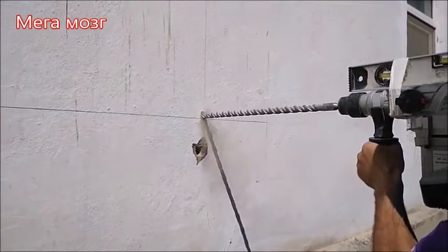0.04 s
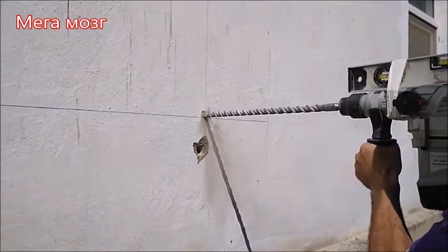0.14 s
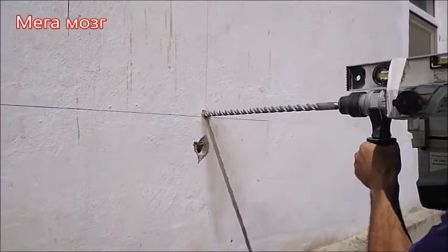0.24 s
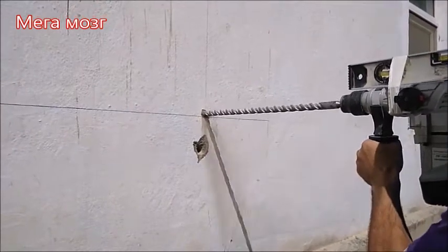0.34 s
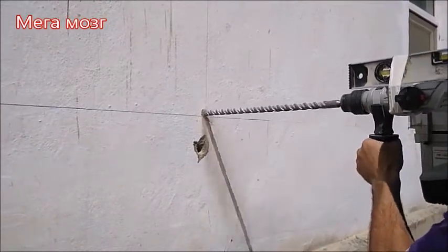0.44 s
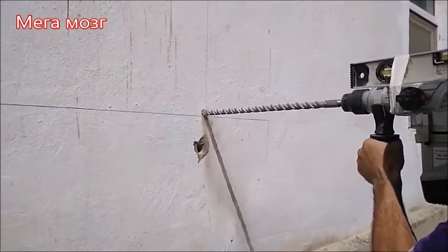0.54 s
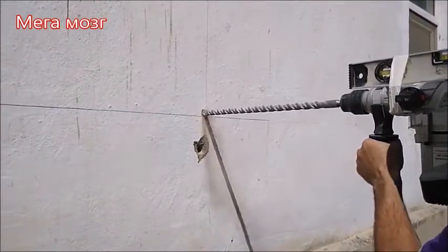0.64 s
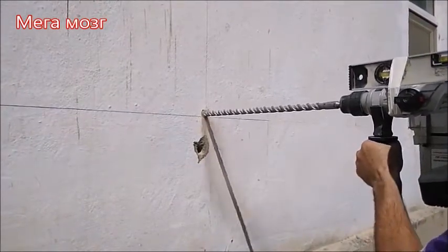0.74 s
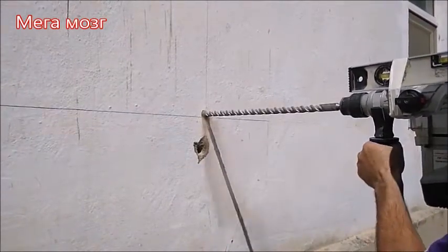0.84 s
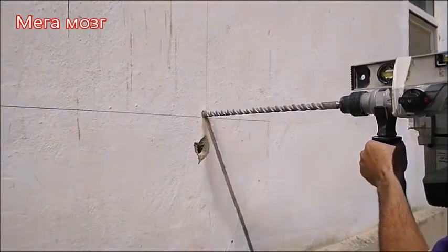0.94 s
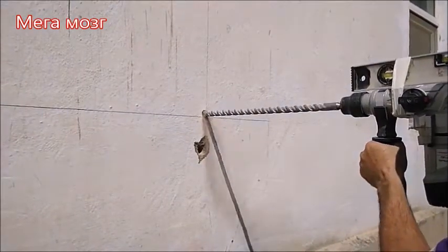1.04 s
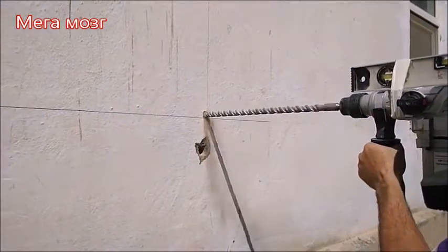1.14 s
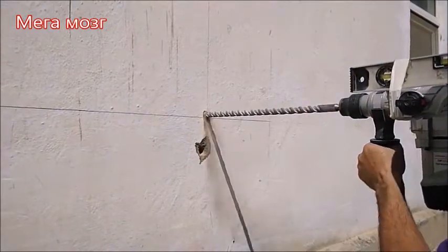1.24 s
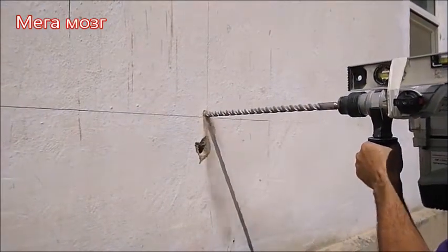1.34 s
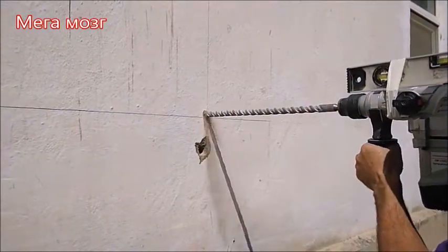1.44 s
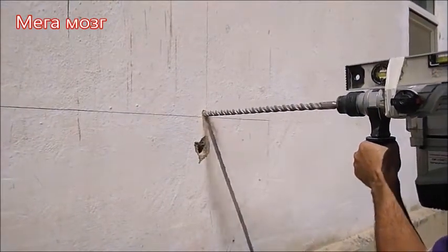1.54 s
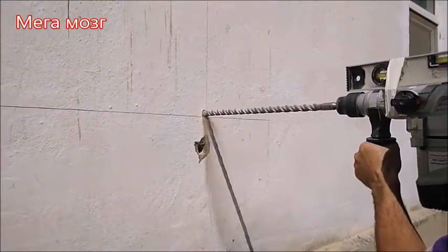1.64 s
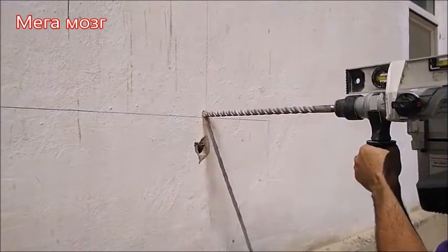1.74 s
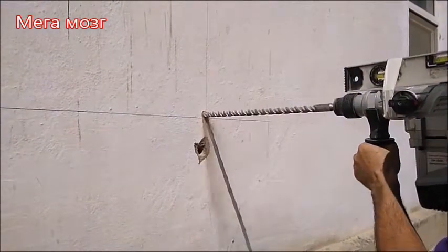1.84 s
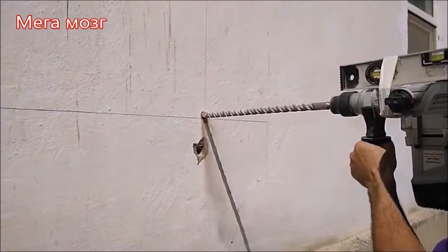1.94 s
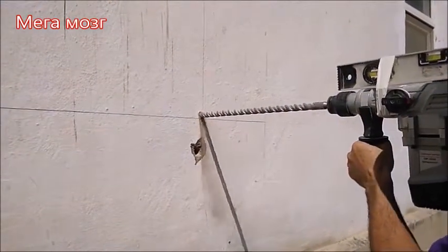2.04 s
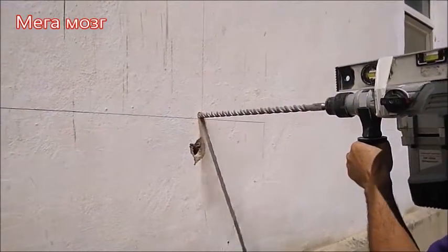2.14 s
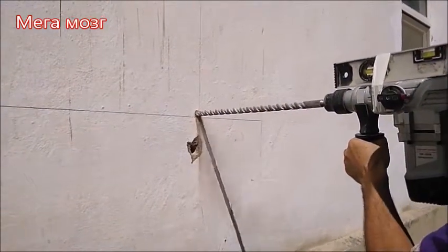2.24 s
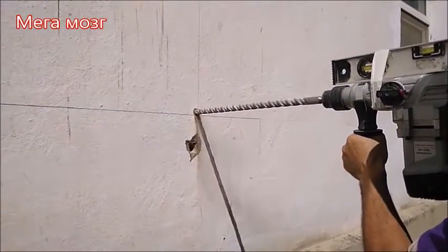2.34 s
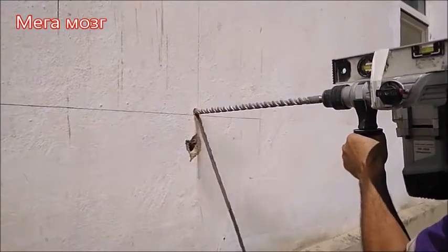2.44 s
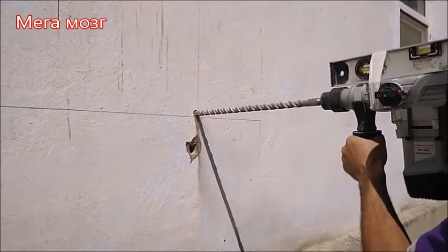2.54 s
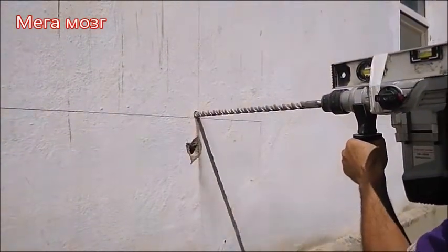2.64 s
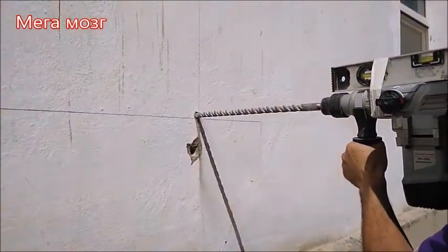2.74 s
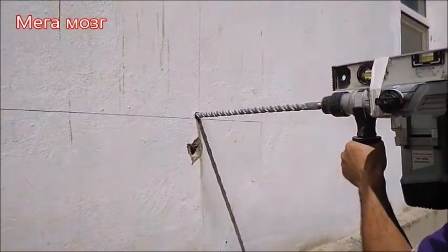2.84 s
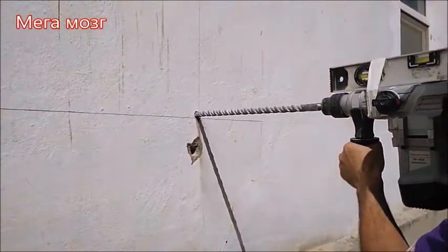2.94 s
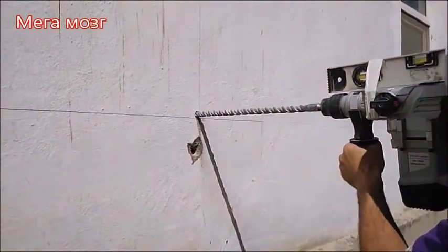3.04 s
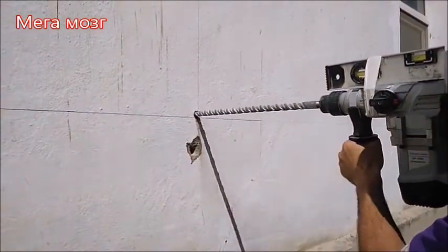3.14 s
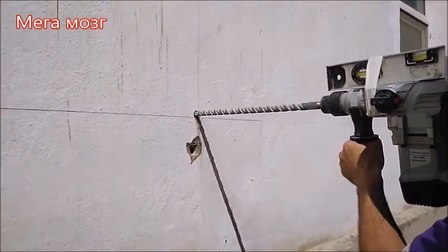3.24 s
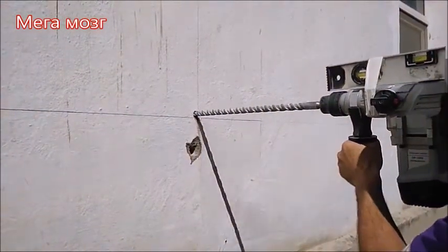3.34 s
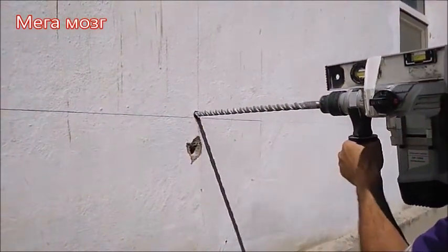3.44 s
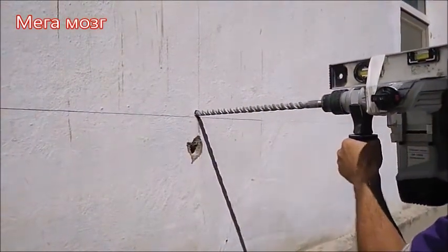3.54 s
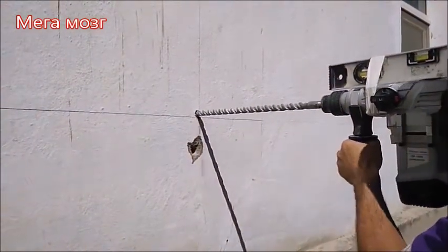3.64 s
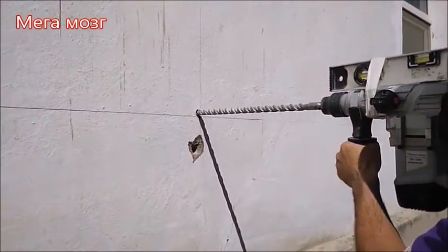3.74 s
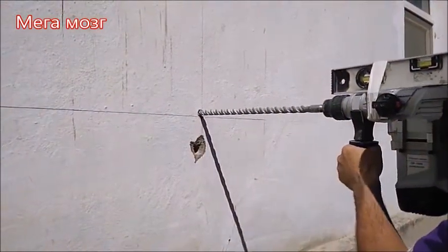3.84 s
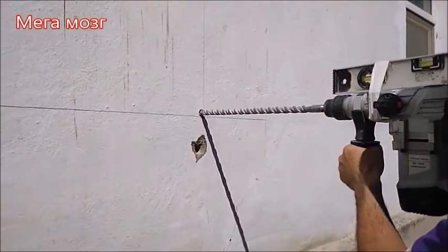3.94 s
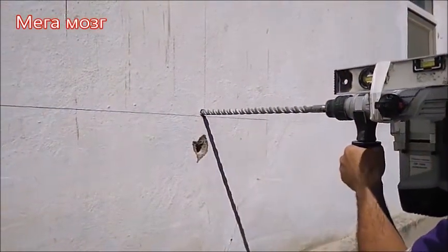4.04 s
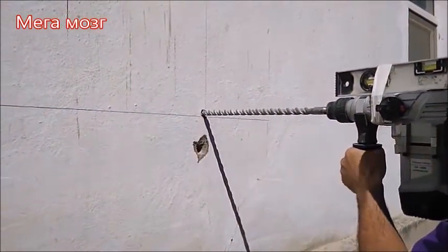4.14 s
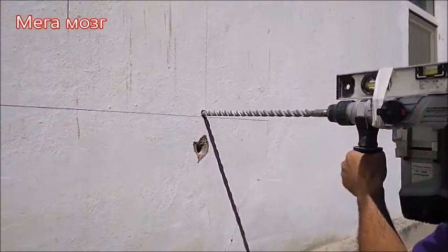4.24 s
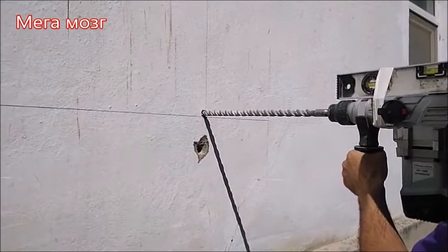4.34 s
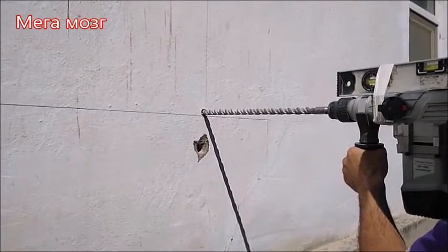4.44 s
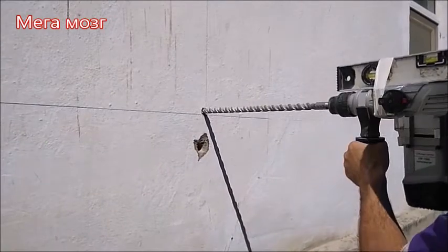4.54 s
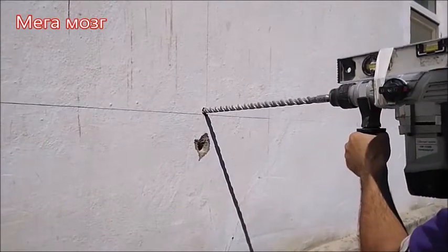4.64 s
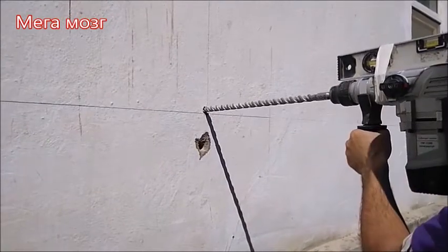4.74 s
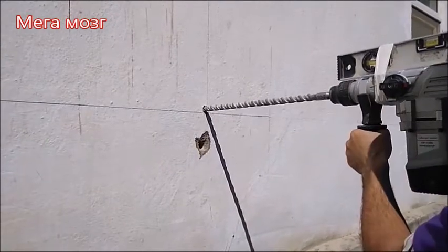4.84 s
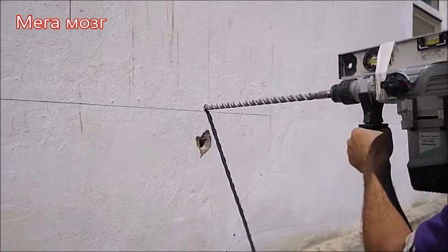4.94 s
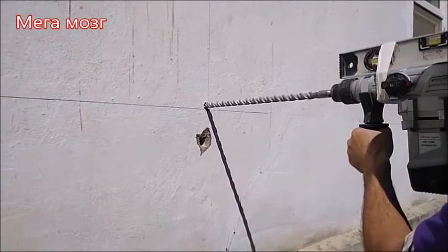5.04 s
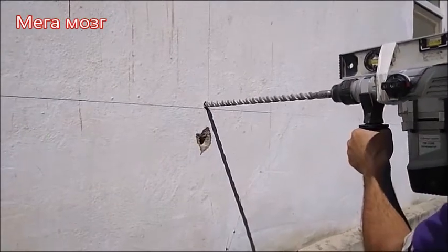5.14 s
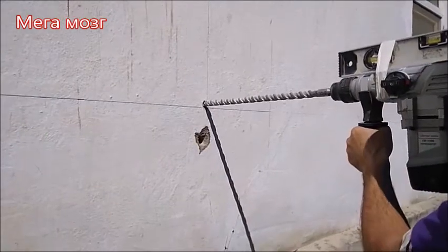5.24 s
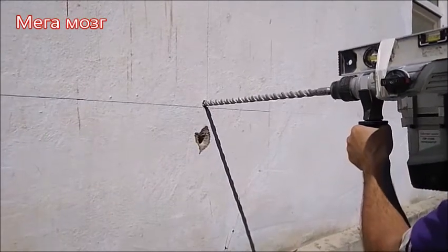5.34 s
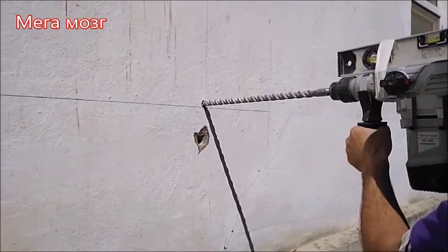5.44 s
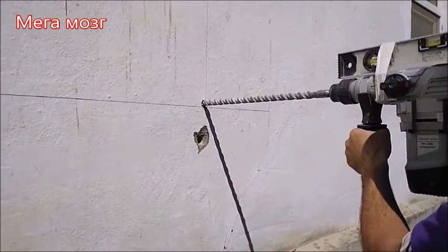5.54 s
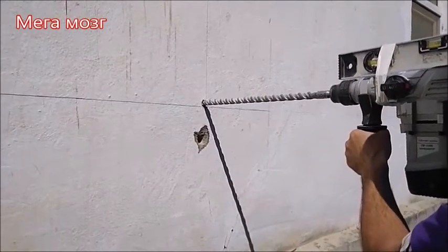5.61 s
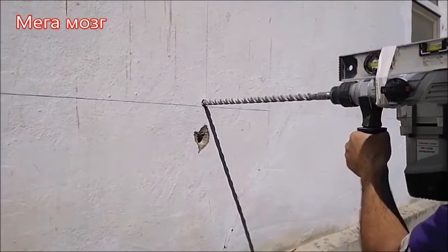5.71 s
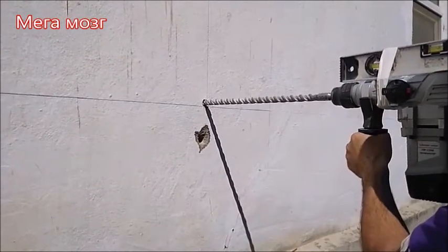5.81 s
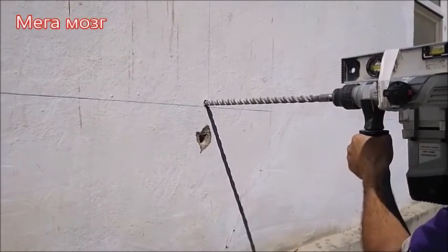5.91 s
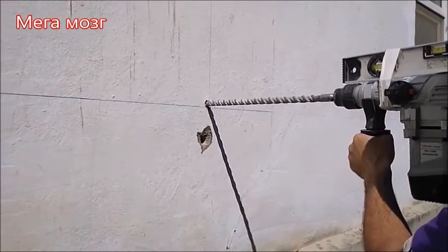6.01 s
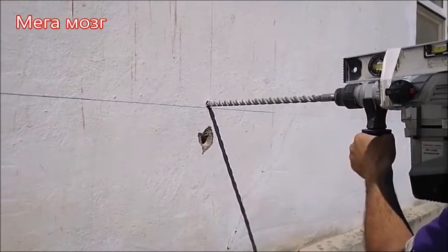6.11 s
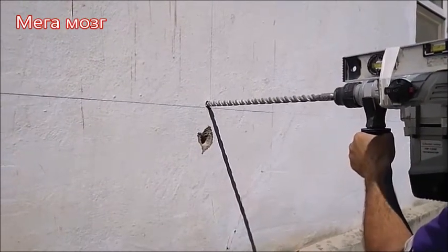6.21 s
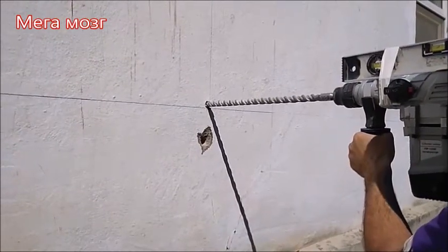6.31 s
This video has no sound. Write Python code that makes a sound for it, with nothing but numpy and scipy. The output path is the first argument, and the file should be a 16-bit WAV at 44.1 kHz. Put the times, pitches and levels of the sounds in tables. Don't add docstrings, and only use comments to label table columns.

```python
import sys
import numpy as np
from scipy import signal
from scipy.fft import rfft, irfft, next_fast_len
from scipy.io import wavfile
from scipy.ndimage import uniform_filter1d

SR = 44100
rng = np.random.default_rng(int(sys.argv[2]) if len(sys.argv) > 2 else 0)


def generate_wav(signal):
    frames = np.transpose(np.atleast_2d(signal))
    scaled = np.clip(frames, -1, 1) * 32767
    pcm = np.round(scaled).astype(np.int16)
    wavfile.write(sys.argv[1], SR, pcm)


def makeup_ratio(level_db):
    decades = np.asarray(level_db, float) / 20
    return 10 ** decades


N = 280917
T = np.arange(N) / SR
RELEASE_S = 3.0
COAST_S = np.clip(T - RELEASE_S, 0, .8)


def unit(x):
    return x / np.sqrt(np.mean(x ** 2))


def even(x):
    return x / np.std(x[..., :int(RELEASE_S * SR)])


def curves(table):
    s, *columns = np.transpose(table)
    return [np.interp(T, s, c) for c in columns]


def colour(x, points):
    hz, db = np.transpose(points)
    size = next_fast_len(N + SR // 4)
    f = np.maximum(np.arange(size // 2 + 1) * SR / size, 1)
    gain = makeup_ratio(np.interp(np.log(f), np.log(hz), db))
    return irfft(rfft(x, size) * gain, size)[..., :N]


def ring(x, modes):
    out = 0
    for hz, width_hz, db in modes:
        b, a = signal.iirpeak(hz, hz / width_hz, SR)
        out = out + makeup_ratio(db) * signal.lfilter(b, a, x) / np.sqrt(width_hz)
    return out


def fade(x, seconds):
    return signal.lfilter([1], [1, -np.exp(-1 / (seconds * SR))], x)


def walk(rate_hz):
    k = int(SR / rate_hz)
    held = np.repeat(rng.standard_normal(N // k + 1), k)
    return 1.3 * uniform_filter1d(uniform_filter1d(held, k), k)[:N]


def noise():
    return rng.standard_normal((2, N))


def bump(s, half_s):
    return np.exp(-((T - s) / half_s) ** 2)


def bumps(table, half_s):
    return sum(db * bump(s, half_s) for s, db in table)


def patchy(x, depth_db, band_hz, seconds):
    f, t, z = signal.stft(x, SR, nperseg=256)
    field = rng.standard_normal(z.shape[-2:])
    field = uniform_filter1d(field, max(int(band_hz / f[1]), 1), axis=0)
    field = uniform_filter1d(field, max(int(seconds / (t[1] - t[0])), 1), axis=1)
    return signal.istft(z * makeup_ratio(depth_db * unit(field)), SR, nperseg=256)[1][..., :N]


# frequency in Hz, level in dB per Hz.
AIR_SPECTRUM = [(240, -28.5), (400, -6.5), (791, -15), (923, -8.5), (1970, -21.5), (3720, -21),
                (4080, -22.5), (8860, -25), (12000, -28.5), (16200, -31)]


def yard_air():
    hiss = patchy(colour(noise(), AIR_SPECTRUM), depth_db=4.0, band_hz=400, seconds=0.074)
    mid, side = unit(hiss) * makeup_ratio(-77 + walk(3.6))
    return np.array([mid + 0.41 * side, mid - 0.51 * side])


# time in seconds, strength in dB, sharpness in dB.
GUSTS = [(3.6, -53.5, 8), (3.75, -79, 6), (3.82, -65, -24), (3.97, -50.5, -3), (4.02, -51, 14),
         (4.06, -63.5, -3), (4.4, -64.5, -6), (4.6, -57.5, 6), (4.8, -76, 19), (5.0, -61, -10),
         (5.235, -45.5, -8), (5.27, -61.5, 5), (5.49, -69, 6), (5.54, -51, -12), (5.74, -50.5, 6.5),
         (5.84, -46.5, -4), (6.0, -49.5, 1), (6.2, -45, 0), (6.27, -54, -14), (6.37, -47, 4)]
# time in seconds, peak in dB, frequency in Hz, left minus right in dB.
EDDIES = [(3.771, -45, 150.3, -6), (3.873, -48, 242.3, 0), (3.99, -40, 182.7, -1.5), (4.003, -50, 520, -2),
          (4.007, -52, 870, -2), (4.012, -42, 210, -2), (4.062, -45, 170, -6), (4.095, -43, 179.2, -12),
          (4.107, -45, 229.4, -8), (4.17, -36.5, 170, -4), (4.184, -39.5, 224, -4), (4.203, -47, 201, -10),
          (4.241, -51.5, 174, -25), (4.339, -54, 150, -20), (4.413, -48.5, 155, -10),
          (4.542, -42.5, 161, -7), (4.706, -35, 175, 0.5), (4.753, -48, 150.4, -11.5),
          (4.847, -50, 146.5, -8), (4.942, -54, 224, -16), (5.034, -38.5, 155, -1.5), (5.052, -32, 187, -1),
          (5.077, -38, 176, -1), (5.1, -35, 171.2, 1), (5.133, -29, 205, -0.5), (5.176, -28.5, 167, -1),
          (5.191, -32, 247, -0.5), (5.225, -47, 750, -2), (5.228, -39, 510, -2), (5.229, -26, 307, 2),
          (5.239, -27.5, 206, -1), (5.365, -49.5, 200, -17), (5.53, -31.5, 199, -1), (5.57, -30, 172, 1),
          (5.661, -29, 214, -0.5), (5.782, -21, 185.5, -0.5), (5.849, -26, 165.5, -0.5),
          (5.885, -30, 232, -0.5), (5.916, -46, 157.2, 0), (5.987, -34.5, 220, -1), (6.028, -26, 225.8, -1),
          (6.088, -22, 203.3, 0), (6.108, -25.5, 201, -1), (6.19, -27.5, 154.2, -0.5),
          (6.202, -26.5, 203, -3), (6.269, -42, 150.7, -4.5), (6.34, -31, 400, -0.5),
          (6.346, -28.5, 236, -0.5), (6.364, -28.5, 200, -0.5)]
# frequency in Hz, level in dB per Hz.
RUMBLE_SPECTRUM = [(15, -72), (25, -59), (65, -46), (124, -1), (179, -1), (239, -3), (348, -10.5),
                   (500, -29.5), (650, -56), (1100, -120)]


def wind():
    mid, side = noise()
    air = np.array([mid + 0.031 * side, mid - 0.086 * side])
    low = unit(colour(air, RUMBLE_SPECTRUM)) * makeup_ratio(3.5 * walk(45))
    flutter = makeup_ratio(4.5 * walk(60))
    hiss_points = [(300, -11.5), (480, 6.5), (850, -15.5), (1000, -21), (2000, -47), (4500, -75)]
    high = unit(colour(air, hiss_points))
    gust_db, sharp_db = curves(GUSTS)
    out = low + high * makeup_ratio(-18.5 + sharp_db) * flutter
    out = out * makeup_ratio(gust_db - 2.5) * np.clip((T - 3.3) / 0.62, 0, 1)
    t = np.arange(int(.06 * SR)) / SR
    for s, db, hz, pan_db in EDDIES:
        cycles = t * hz
        envelope = np.minimum(cycles / 1.3, 1) ** 2 * np.exp(.3 - (cycles / 2.22) ** 2) * 0.51
        shape = makeup_ratio(db + np.array([[pan_db], [-pan_db]]) / 2) * envelope
        i = int(s * SR)
        thump = (shape * np.sin(2 * np.pi * cycles))[:, :N - i]
        rustle = makeup_ratio(-29.5) * min(hz / 190, 2) ** 2 * shape[:, :N - i] * high[:, i:i + len(t)]
        out[:, i:i + len(t)] += thump + rustle
    return colour(out, [(40, -13.5), (110, 0.5)])


# start in seconds, length in seconds, start Hz, end Hz, level in dB.
NEAR_NOTES = [(4.76, 0.029, 4690, 4790, -79), (4.796, .045, 4130, 4140, -75.5),
              (4.855, 0.04, 5630, 5550, -62.5), (4.867, 0.029, 4910, 5100, -63),
              (4.882, 0.024, 7400, 7100, -70.5), (4.895, .03, 8800, 8900, -71),
              (4.858, .02, 4600, 4550, -76), (4.916, 0.026, 4850, 4570, -67),
              (4.931, 0.045, 4540, 4550, -72), (4.77, .03, 5900, 6100, -80),
              (4.916, 0.043, 7450, 6600, -66), (4.98, .03, 5750, 5870, -66), (4.996, .025, 6700, 6400, -64),
              (4.997, .025, 5130, 5030, -67), (5.085, .04, 6850, 7000, -71),
              (5.015, 0.035, 6260, 6150, -59), (5.025, 0.048, 5700, 5040, -61.5),
              (5.07, .035, 5270, 5620, -69), (5.097, 0.026, 7800, 7500, -65),
              (5.107, .08, 6900, 6800, -72.5), (5.15, .04, 6250, 6000, -71),
              (5.152, 0.028, 5770, 5500, -67), (5.17, .03, 5400, 4960, -58.5),
              (5.178, 0.045, 4840, 4450, -59), (5.207, 0.051, 3730, 3790, -61),
              (5.242, 0.035, 4530, 4570, -60.5), (5.306, 0.033, 3930, 3800, -63),
              (5.308, 0.021, 4800, 5210, -65), (5.345, 0.04, 3780, 3770, -69.5),
              (5.351, 0.03, 4200, 4200, -65.5), (5.345, 0.02, 6300, 6250, -71),
              (5.35, .02, 5700, 5700, -71), (5.283, .03, 4700, 4650, -76), (5.305, .018, 6450, 6550, -73),
              (5.41, 0.027, 4350, 4250, -80)]
# start in seconds, length in seconds, start Hz, end Hz, level in dB.
FAR_NOTES = [
    (5.88, .08, 5010, 5040, -75),
    (6.009, .035, 5110, 5160, -75),
    (6.09, .034, 5080, 5050, -75),
    (6.19, .03, 5050, 5150, -82),
    (6.029, .09, 2850, 2830, -78),
    (5.829, .45, 1710, 1800, -86),
    (5.541, .07, 1155, 1095, -74),
    (5.3, .05, 1070, 1040, -78),
]


def bird():
    out = np.zeros(N)
    husk, trill = walk(1400), makeup_ratio(2.6 * walk(260))
    for s, length_s, hz0, hz1, db in NEAR_NOTES + FAR_NOTES:
        i, n = int(s * SR), int(length_s * SR)
        rough = .016 if s < 5.5 else .006
        hz = np.linspace(hz0, hz1, n) * (1 + rough * husk[i:i + n])
        tone = np.sin(2 * np.pi * np.cumsum(hz) / SR)
        rasp_hz = hz * (1.04 + 3 * rough * husk[i - n:i])
        rasp = .55 * np.sin(2 * np.pi * np.cumsum(rasp_hz) / SR)
        out[i:i + n] += makeup_ratio(db - 0.5) * np.hanning(n) ** 0.41 * trill[i:i + n] * (tone + rasp)
    tail = rng.standard_normal((2, SR // 5)) * np.exp(-np.arange(SR // 5) / (.03 * SR))
    return out + makeup_ratio(-33.5) * signal.fftconvolve(out[None], tail, axes=1)[:, :N]


# time in seconds, peak in dB.
CHUCK_TICKS = [
    (3.7599, -59),
    (3.915, -59.5),
    (4.1804, -57),
    (4.2168, -53.5),
    (4.3976, -56),
    (4.4894, -64),
]


def ticks():
    at = np.zeros(N)
    for s, db in CHUCK_TICKS:
        at[int(s * SR)] = makeup_ratio(db - 4.5)
    click = noise() * fade(fade(at, 0.0024), 0.0097) / 60
    click = colour(click, [(800, -16.5), (2000, -12.5), (8000, 0.5), (15000, -14)])
    return click * makeup_ratio(np.array([[-1.5], [1.5]]))


# frequency in Hz, width in Hz, level in dB.
CASING = [(1170, 320, -66), (1630, 330, -58), (2540, 370, -58.5), (2500, 300, -72), (2650, 400, -77),
          (3700, 500, -77), (4750, 700, -71), (2280, 160, -72), (5650, 250, -76)]
# time in seconds, rise in dB.
GEAR_CATCHES = [
    (3.64, 2),
    (3.668, -7),
    (3.7, 2),
    (3.745, -3),
    (3.82, 3),
    (3.842, -4),
    (3.915, 3),
    (3.938, -6),
    (3.985, 2),
    (4.07, -10),
]


def whine():
    start_s, end_s, throb_db = 3.56, 4.14, 5
    late = np.clip(T - start_s, 0, end_s - start_s)
    mesh_hz = 680 - 397 * late - 158 * late ** 2
    phase = 2 * np.pi * np.cumsum(mesh_hz * (1 + 0.005 * walk(140))) / SR
    slack = phase / 22
    tone = 0
    for k, (peak_hz, width_hz, db) in zip((2, 3, 4, 5, 6, 7, 8, 3.72, 8.8), CASING):
        throb = np.tanh(walk(70) + 1.5 * np.sin(slack + k))
        resonance = 1 / (1 + (2 * (k * mesh_hz - peak_hz) / width_hz) ** 2)
        partial = np.sin(k * phase + 0.21 * walk(400))
        tone = tone + makeup_ratio(db - 1.5 + throb_db * throb) * resonance * partial
    emerge = np.clip(np.minimum((T - start_s) / 0.034, (end_s - T) / 0.088), 0, 1)
    tone = tone * emerge * makeup_ratio(bumps(GEAR_CATCHES, 0.013))
    linger_s = 4.08
    linger = np.sin(2 * np.pi * (3720 * T - 150 * (T - linger_s) ** 2))
    linger = linger * makeup_ratio(-81 + throb_db * np.sin(slack)) * bump(linger_s, .11)
    return (tone + linger) * makeup_ratio(np.array([[-3.5], [3.5]]))


# time in seconds, chatter in dB, push of the bit on the wall in dB.
EFFORT = [(0.0, -23.5, -3.5), (0.09, -28, -1.5), (0.24, -24.5, 1), (0.55, -23.5, -3.5), (0.67, -25.5, 1),
          (0.86, -25.5, -2), (1.01, -27, 1), (1.17, -25, -4.5), (1.3, -28.5, 1.5), (1.6, -24.5, -2),
          (1.89, -29, 2), (2.08, -27, -3), (2.81, -25, -2), (3.14, -27.5, -5), (3.4, -37.5, -1),
          (3.58, -54.5, 6.5), (3.74, -78, 0), (4.2, -86.5, 12.5)]


def effort():
    return curves(EFFORT)


# time in seconds, strokes per second.
STROKE_PACE = [
    (0, 65.85),
    (1.0, 65.87),
    (1.2, 66.5),
    (1.4, 65.9),
    (1.9, 65.95),
    (2.1, 66.6),
    (2.4, 67.15),
    (2.7, 66.4),
    (3.0, 66.2),
]


def strokes():
    return np.cumsum(curves(STROKE_PACE)[0]) / SR - .745


# time in seconds, peak in dB.
COASTING_BLOWS = [(3.022, -18), (3.0442, -15.5), (3.0689, -17.5), (3.0897, -16.5), (3.116, -20.5),
                  (3.1442, -12), (3.1772, -15.5), (3.208, -15.5), (3.242, -17.5), (3.288, -29.5),
                  (3.339, -28), (3.401, -30.5), (3.486, -40)]


def blows(jitter_s, scatter_db):
    at = np.interp(np.arange(198), strokes(), T)
    chance = rng.standard_normal((len(at), 2))
    out = np.zeros(N)
    out[np.abs((at + jitter_s * chance[:, 0]) * SR).astype(int)] = makeup_ratio(scatter_db * chance[:, 1])
    s, db = np.transpose(COASTING_BLOWS)
    out[(s * SR).astype(int) + SR // 220] = makeup_ratio(db - np.interp(s, T, effort()[0]) - 5)
    return out


# time in seconds, share of rattle power that follows the blows, 0-1.
BLOW_SHARE = [
    (0, 0.11),
    (3.0, 0.17),
    (3.06, 0.8),
    (3.28, 0.7),
    (3.5, 0.3),
    (3.9, 0.2),
]
# time in seconds, peak in dB.
GRIT_STRIKES = [(0.027, 4), (0.0729, -6), (0.165, -7.5), (0.1878, -5), (0.3573, -7), (0.4488, -6),
                (0.6181, -8.5), (0.9188, -7), (1.1333, -10), (1.2367, -5), (1.4631, -9), (1.863, -9),
                (1.9829, -11), (2.0722, -4.5), (2.0827, -9.5), (2.2513, -12), (2.3111, -6), (2.5289, -8),
                (2.5935, -10), (2.6774, -11.5), (2.9482, -12)]


def contacts():
    blow = blows(jitter_s=.00008, scatter_db=2.0)
    bounce = (rng.random(N) < 200 / SR) * makeup_ratio(4.0 * rng.standard_normal(N))
    s, db = np.transpose(GRIT_STRIKES)
    bounce[(s * SR).astype(int) + SR // 200] = makeup_ratio(db + 10.5)
    swell = even(fade(fade(blow[::-1], .003)[::-1], .004))
    swell = swell + 1.2 * even(fade(fade(bounce, .0025), 0.0025)[::-1])
    share = np.clip(curves(BLOW_SHARE)[0], 0, 1)
    rattle = noise() * (np.sqrt(1 - share) + np.sqrt(share) * 0.17 * swell) * makeup_ratio(0.7 * walk(25))
    pulse = even(np.array([blow, np.roll(blow, 9)])) * np.where(T < RELEASE_S, 1, .4)
    return pulse, rattle


# frequency in Hz, level in dB per Hz.
HOUSING_SPECTRUM = [(15, -74), (25, -59.5), (189, -7.5), (226, -7), (257, 0.5), (295, -9), (325, 2),
                    (369, -5), (700, -8.5), (910, -40.5), (1540, -120)]


def housing(pulse, push_db):
    hum_db = -12 + push_db + 29 * COAST_S ** 3 - push_db
    hum_db = hum_db + 7 * bump(3.2, 0.07)
    hum_db = hum_db - 13.5 * bump(3.36, 0.078)
    hum = even(colour(0.81 * pulse + 0.94 * noise(), HOUSING_SPECTRUM))
    return hum * makeup_ratio(hum_db + 2.0 * walk(20))


# frequency in Hz, level in dB per Hz.
WALL_SPECTRUM = [(380, -40), (650, -25), (856, -4), (977, 7), (1070, -5.5), (1230, -3), (1410, -13.5),
                 (1600, -4.5), (2080, -39.5), (3520, -120)]
# time in seconds, half length in seconds, rise in dB.
GEAR_TONES = [(0.222, 0.036, 8), (0.318, 0.051, 10.5), (.43, 0.084, 13), (.61, .045, 17),
              (0.706, 0.011, 10), (0.737, .03, 14), (.9, .08, 6), (1.43, .04, 12), (1.65, .02, 2.5),
              (2.015, .04, 16.5), (2.467, .05, 10.5), (3.0, .06, 8.5)]
# time in seconds, Hz, half length in seconds, dB re the wall.
HOLE_BOOMS = [(.015, 1138, 0.045, 3.5), (0.193, 932, 0.11, -4.5), (1.17, 1080, 0.021, 10),
              (1.239, 1096, 0.029, 6), (1.446, 1195, 0.034, -1), (1.513, 970, .04, -6),
              (1.547, 960, .03, -5.5), (1.667, 990, 0.035, 2.5), (1.78, 1136, 0.021, 0),
              (1.904, 1094, 0.024, 4), (2.02, 1150, .025, 8), (2.052, 960, .02, 0), (2.116, 1150, .02, 0),
              (2.184, 1120, 0.05, -3), (2.293, 1130, 0.048, -1.5), (2.322, 1180, .03, -7.5),
              (2.34, 960, 0.025, 1), (2.342, 800, .04, -3), (2.586, 915, 0.033, -4),
              (2.755, 1178, 0.056, 3.5), (2.884, 1000, .015, 9.5), (2.958, 1033, 0.027, 8.5),
              (3.094, 955, 0.066, 5), (3.304, 1130, 0.042, 5.5)]


def wall(pulse, rattle, push_db):
    wall_db = -9 + push_db + 1.7 * walk(30)
    thump = .6 * pulse + rattle
    out = even(patchy(colour(thump, WALL_SPECTRUM), depth_db=3.5, band_hz=200, seconds=0.028))
    mesh = np.sin(2 * np.pi * 15 * strokes()) * makeup_ratio(1.1 * walk(40)) * (T < RELEASE_S)
    sings_db = sum(db * bump(s, half_s) for s, half_s, db in GEAR_TONES)
    out = out + makeup_ratio(-4.5 + sings_db) * mesh
    for s, hz, half_s, db in HOLE_BOOMS:
        out = out + even(ring(thump, [(hz, 45, 0)])) * makeup_ratio(db) * bump(s, half_s)
    hole = even(ring(0.087 * pulse + rattle, [(1170, 280, -1.5), (1860, 30, -11.5)]))
    out = out + hole * makeup_ratio(-13 + 4 * np.minimum(T, 3.2) + 1.1 * walk(13.0))
    throb = 1 + .25 * np.cos(2 * np.pi * strokes()) * (T < RELEASE_S)
    return out * throb * makeup_ratio(wall_db)


GRIP_S = 1.45
# frequency in Hz, level in dB per Hz.
CHATTER_SPECTRUM = [(820, -47), (1400, -27), (1630, -6.5), (2140, -11), (2290, -10), (2720, -7),
                    (3730, -3.5), (4850, -4), (5220, -4.5), (5550, -5.5), (5780, -20), (6000, -16),
                    (7800, -41.5), (13200, -120)]
# frequency in Hz, level in dB per Hz.
FIZZ_SPECTRUM = [(5500, -30.5), (5950, -9.5), (6300, -5), (6600, -3.5), (9000, -4), (11000, -3),
                 (11400, -8.5), (12300, -6), (13400, -16), (14300, -7), (15000, -17), (15600, -9)]
# frequency in Hz, width in Hz, level in dB.
CHUCK_MODES = [(3605, 50, -4), (3816, 25, -5), (4500, 120, -3), (5080, 55, -1), (6375, 50, -5),
               (6613, 35, -2), (7700, 120, -2), (8747, 40, -5), (10026, 50, -3), (12100, 90, -8)]


def chatter(pulse, rattle):
    fizz_db = 5 + 0.8 * walk(12) - 18 * np.minimum(COAST_S, .55)
    fizz = even(colour(rattle, FIZZ_SPECTRUM))
    top = colour(fizz, [(.95 * 9900, -60), (1.05 * 9900, 0)])
    sheen = colour(fizz, [(11000, -60), (11600, 0)])
    fizz = fizz - sheen + 1.07 * patchy(sheen, depth_db=2.0, band_hz=500, seconds=.045)
    fizz = fizz - top * (1 - makeup_ratio(-6 * COAST_S))
    steel = even(colour(rattle, CHATTER_SPECTRUM)) + makeup_ratio(fizz_db + 1.5) * fizz
    chuck = even(ring(rattle + 0.65 * pulse, CHUCK_MODES))
    steel = steel + makeup_ratio(-5.5) * chuck * makeup_ratio(0.39 * fizz_db)
    shank = colour(steel, [(3300, -60), (3700, 0), (5400, 0), (5700, -60)])
    shank_db = 2 - 3 * np.clip((T - GRIP_S) / 0.3 + .5, 0, 1)
    steel = steel + shank * (makeup_ratio(shank_db) - 1)
    return makeup_ratio(-3.0) * patchy(steel, depth_db=2.5, band_hz=500, seconds=.04)


# frequency in Hz, width in Hz, level in dB.
UPPER_MODES = [(10706, 22, 0), (10830, 60, -8), (10490, 50, -12), (10940, 50, -12)]
# time in seconds, rise in dB.
UPPER_FLARES = [(0.0, 11.5), (.04, 2.5), (0.076, -1), (.12, 4.5), (.68, 5.5), (.8, 4), (.93, 4), (1.01, 6),
                (1.07, -0.5), (1.86, 8.5), (2.0, 4.5), (2.085, 9), (2.15, 4), (2.309, 3), (2.43, 3.5),
                (2.541, 6), (2.659, 9)]
# time in seconds, rise in dB.
LOWER_STROKES = [
    (0.049, -3.5),
    (0.289, 4.5),
    (.39, 5.5),
    (0.551, 11.5),
    (.63, 3.5),
    (.766, 9.5),
    (.95, 1),
    (1.19, 3.5),
    (1.3, 1),
    (1.4, -6),
]
# time in seconds, rise in dB.
BIT_SQUEALS = [
    (.55, -0.5),
    (.95, 12),
    (1.24, 11),
    (1.37, 12),
    (1.416, 13),
]


def bit(pulse, rattle):
    knock = rattle + .5 * pulse
    free_db = -2.5 * T - 81 * np.maximum(T - RELEASE_S, 0)
    upper_db = -24 + free_db + bumps(UPPER_FLARES, .045) + 1.9 * walk(90)
    grip_db = -10.5 * np.clip((T - GRIP_S) / 0.02, 0, 1)
    lower_db = -29 + free_db + grip_db + 1.2 * walk(30)
    lower = even(ring(knock, [(5395, 42, 0)])) * makeup_ratio(bumps(LOWER_STROKES, .03))
    squeal = even(ring(knock, [(5264, 40, 0)])) * makeup_ratio(-4 + bumps(BIT_SQUEALS, .03))
    return even(ring(knock, UPPER_MODES)) * makeup_ratio(upper_db) + (lower + squeal) * makeup_ratio(lower_db)


# frequency in Hz, side minus mid in dB.
SIDE_SPECTRUM = [(60, -15.5), (350, -10.5), (700, -10.5), (1400, -11.5), (2200, -8), (3600, -5),
                 (5300, -10.5), (6200, -3.5), (10000, -5.5), (14000, -1)]


def drill():
    chatter_db, push_db = effort()
    pulse, rattle = contacts()
    body = wall(pulse, rattle, push_db) + housing(pulse, push_db) + chatter(pulse, rattle)
    body = body * makeup_ratio(chatter_db) * np.clip((4.3 - T) / 0.12, 0, 1)
    mid, side = body + bit(pulse, rattle)
    side = colour(side, SIDE_SPECTRUM)
    pan_db = -1.8 - 0.25 * T - 17 * COAST_S + 1.4 * walk(9.3)
    return np.array([mid + side, mid - side]) * makeup_ratio(np.array([pan_db, -pan_db]) / 2)


def scene():
    return yard_air() + wind() + bird() + ticks() + whine() + drill()


# frequency in Hz, dB under the neighbourhood at which a band is dropped.
BAND_DROP = [(1500, -8), (2200, -15), (3000, -8.5), (5300, -8.5), (5850, -5.5), (6300, -8.5), (9000, -8.5),
             (11500, -7), (13500, -2), (15800, -4)]


def starve(x, line_db, whim_db, busy_db):
    lead = 242
    f, t, z = signal.stft(np.pad(x, ((0, 0), (lead, 0))), SR, nperseg=2048)
    power = np.abs(z) ** 2 + 1e-20
    both = uniform_filter1d(power.mean(axis=0), size=3, axis=1)
    band = np.repeat(both[:-1].reshape(-1, 8, len(t)).mean(axis=1), 8, axis=0)
    band = np.concatenate([band, band[-1:]])
    around = uniform_filter1d(both, size=120, axis=0)
    whim = uniform_filter1d(rng.standard_normal((129, len(t))), size=3, axis=1)
    whim = np.repeat(whim, 8, axis=0)[:len(f)]
    whim = whim * np.interp(f, [9000, 13000], [.85, 2.1])[:, None]
    limit_db = np.interp(f, *np.transpose(BAND_DROP), left=-60)[:, None] + whim_db * whim
    strong_band = band > around * makeup_ratio(2 * limit_db)
    strong_line = (power > band * makeup_ratio(2 * line_db)) | (f[:, None] < 1200)
    busy = both[f > 2000].sum(axis=0) > makeup_ratio(2 * busy_db)
    kept = z * ((strong_band & strong_line) | ~busy)
    return signal.istft(kept, SR, nperseg=2048)[1][:, lead:lead + N]


# frequency in Hz, share of bands made mono, 0-1.
MONO_SHARE = [(700, 0), (1300, .3), (1700, .42), (2100, .65), (2500, .82), (3200, .94), (5000, .94),
              (5300, .7), (5750, .5), (6200, 0)]
WIDE_MOMENTS_S = [1.1, 1.645, 1.91, 2.26, 2.29, 2.735, 2.86, 2.99, 3.04, 3.1]


def narrow(x):
    lead, window = 242, signal.windows.kaiser_bessel_derived(2048, 4 * np.pi)
    mid, side = (x[0] + x[1]) / 2, (x[0] - x[1]) / 2
    f, t, z = signal.stft(np.pad(side, (lead, 0)), SR, window, nperseg=2048)
    t = t - lead / SR
    band = (11 * np.log(np.maximum(f, 1))).astype(int)
    spare = sum(np.exp(-((t - s) / .017) ** 2) for s in WIDE_MOMENTS_S)
    spare = spare + np.clip((t - 2.7) / 1.6, 0, 1)
    share = np.interp(f, *np.transpose(MONO_SHARE))[:, None] * (1 - np.minimum(spare, 1)) * (t < 3.22)
    z = z * (rng.random((band[-1] + 1, len(t)))[band] > share)
    side = signal.istft(z, SR, window, nperseg=2048)[1][lead:lead + N]
    return np.array([mid + side, mid - side])


def top_cut(x):
    return signal.sosfilt(signal.butter(12, 16370, fs=SR, output="sos"), x)


def record(dry):
    thin = .8 * np.tanh(dry / .8)
    thin = signal.sosfilt(signal.butter(2, 110, "highpass", fs=SR, output="sos"), thin)
    thin = signal.sosfilt(signal.ellip(10, .3, 60, 15800, fs=SR, output="sos"), thin)
    mix = narrow(starve(thin, line_db=-2.0, whim_db=6.5, busy_db=-56))
    return top_cut(mix)


dry = scene()
out = record(dry)
generate_wav(out)
```